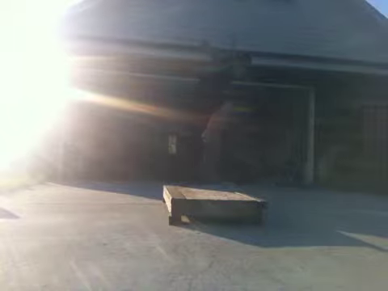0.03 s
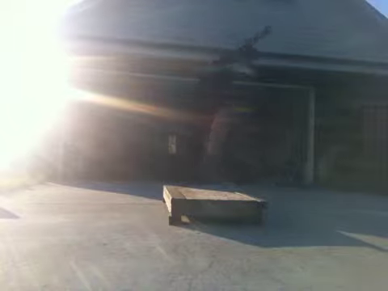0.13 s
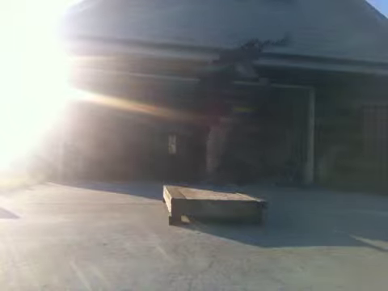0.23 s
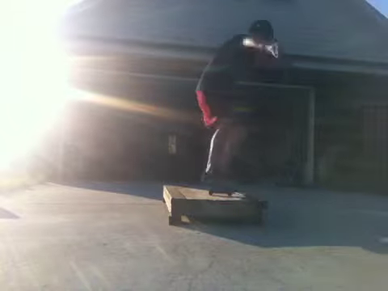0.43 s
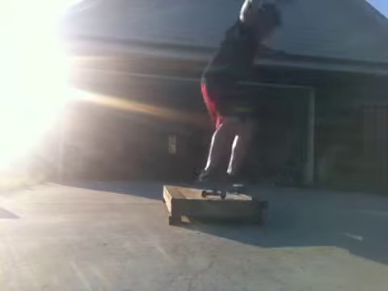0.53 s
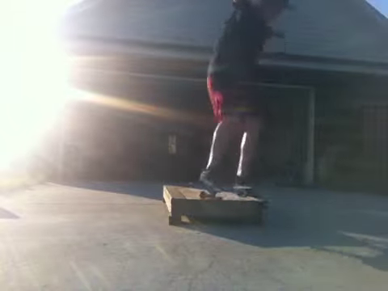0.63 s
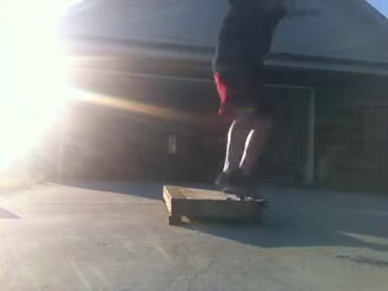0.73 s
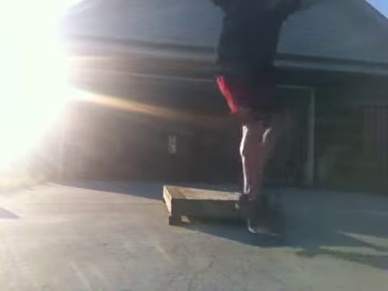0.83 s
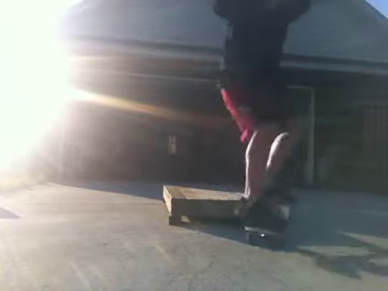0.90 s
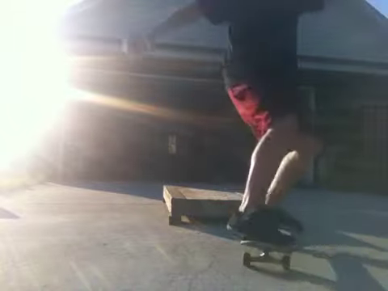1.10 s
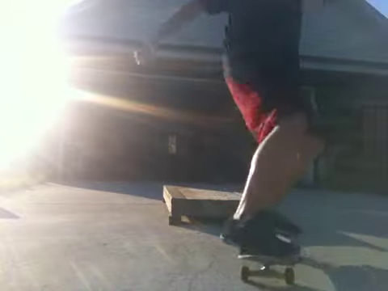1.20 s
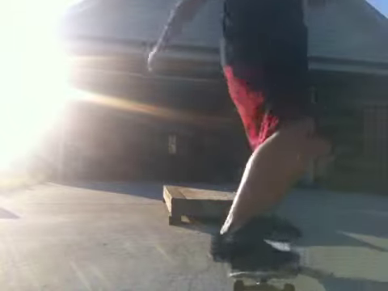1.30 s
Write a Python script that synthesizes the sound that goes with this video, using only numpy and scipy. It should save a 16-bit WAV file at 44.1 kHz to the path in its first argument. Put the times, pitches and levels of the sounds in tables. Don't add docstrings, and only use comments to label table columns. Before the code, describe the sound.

Skateboard landing with woody thuds and light metal clacks on a box, then dropping to concrete

```python
import sys
import numpy as np
from scipy import signal
from scipy.fft import rfft, irfft, next_fast_len
from scipy.io import wavfile
from scipy.ndimage import map_coordinates

SR = 44100
rng = np.random.default_rng(int(sys.argv[2]) if len(sys.argv) > 2 else 0)


def makeup_ratio(level_db):
    decades = np.asarray(level_db, float) / 20
    return 10 ** decades


def master_out(mix):
    frames = np.transpose(np.atleast_2d(mix))
    ceiling = np.clip(frames, -1, 1)
    pcm = np.round(ceiling * 32767).astype(np.int16)
    wavfile.write(sys.argv[1], SR, pcm)


N = 59535

# start in seconds, thud pitch in Hz,
# thud peak in dB, loudest region of the deck in Hz, deck peak in dB.
POP_AND_BOX_BLOWS = [(.006, 290, -73, 700, -46.5), (.012, 262, -48.5, 500, -40.5),
                     (.032, 300, -47, 500, -68), (.069, 310, -47.5, 454, -61), (.204, 300, -54, 500, -63.5),
                     (.241, 260, -32.5, 870, -32.5), (.244, 196, -43, 475, -38.5),
                     (.250, 267, -26.5, 710, -34.5), (.254, 181, -25.5, 507, -27),
                     (.266, 198, -40, 520, -38), (.287, 177, -31.5, 500, -63), (.296, 177, -54, 500, -53),
                     (.319, 260, -43, 590, -59), (0.329, 172, -37, 400, -42.5),
                     (.348, 282, -66, 524, -37.5), (0.359, 295, -52, 500, -51),
                     (.369, 295, -37.5, 442, -43)]
# start in seconds, thud pitch in Hz,
# thud peak in dB, loudest region of the deck in Hz, deck peak in dB.
DROP_BLOWS = [(.891, 274, -37.5, 611, -32), (.897, 269, -29, 670, -33.5), (0.907, 160, -40, 400, -43),
              (.914, 277, -36, 646, -31.5), (.927, 300, -34, 480, -55), (0.934, 194, -32, 400, -31.5),
              (0.949, 269, -33.5, 470, -67), (0.97, 220, -41, 440, -70), (0.987, 220, -47, 400, -67),
              (1.0018, 260, -60, 500, -29), (1.009, 310, -65, 780, -33.5), (1.0133, 257, -24.5, 500, -26.5),
              (1.028, 310, -29.5, 495, -43.5), (1.037, 220, -58, 400, -63), (1.055, 160, -40, 400, -76.5),
              (1.153, 170, -49.5, 500, -51.5)]
# pitch in Hz, level in dB, T60 in seconds.
DECK_MODES = [(400, -3.5, 0.076), (485, 6.5, 0.042), (549, -2.5, 0.043), (655.4, 3.5, .03),
              (722, -1, 0.062), (870, -2, 0.028), (1030, -1.5, 0.036)]
# start in seconds, loudest region in Hz, peak in dB.
TRUCK_CLACKS = [(.006, 3000, -56.5), (.007, 2190, -69), (.007, 1480, -50.5), (.014, 2740, -60),
                (0.239, 3200, -55.5), (0.243, 1350, -44), (.248, 2190, -48), (0.26, 1440, -44),
                (.270, 1590, -56), (0.291, 1300, -57.5), (0.349, 2950, -47), (.353, 1390, -46),
                (0.376, 1370, -61), (.892, 2344, -49.5), (0.897, 1400, -53), (.926, 2200, -56),
                (.933, 1440, -50.5), (1.002, 1530, -47), (1.011, 3200, -50), (1.014, 1540, -39),
                (1.017, 3400, -45), (1.015, 1880, -54.5), (1.015, 4900, -63), (.242, 4500, -45.5),
                (.348, 4600, -53), (1.038, 1330, -76)]
# pitch in Hz, level in dB, T60 in seconds.
TRUCK_MODES = [(1105, 5, 0.034), (1216, 5.5, 0.026), (1480, 3, 0.03), (1612, -3, 0.026),
               (1880, -7.5, 0.036), (2190, -4, 0.048), (2814, 2.5, 0.019), (2950, 2.5, 0.015),
               (3200, 6.5, 0.012), (3508, -7, 0.037), (4360, -14, 0.035), (4900, -6, 0.013)]
# time in seconds, level in dB.
ROLL_LEVEL = [(0, -58), (.1, -75), (.23, -83), (.3, -48), (.42, -52), (.5, -56), (.54, -54), (.63, -53),
              (.68, -55.5), (.73, -59.5), (.76, -60.5), (.88, -61.5), (1.0, -46), (1.11, -54),
              (1.14, -59.5), (1.19, -48.5), (1.235, -52.5), (1.3, -49)]
# centre in Hz, width in Hz, level in dB.
BOX_RESONANCES = [(160, 52, -5.5), (220, 24.8, 1.5), (260, 17.2, -3), (310, 23, -1.5), (418, 60, -9),
                  (491.4, 34.2, -4), (670, 90, -16.5), (960, 260, -25)]
# centre in Hz, width in Hz, level in dB.
GROUND_RESONANCES = [(141, 64, -5), (170, 17.6, 5.5), (222, 59, -10.5), (300, 30, -7), (390, 22, -14.5),
                     (500, 53, -13.5), (730, 87, -40.5), (900, 120, -40)]
# time in seconds, level in dB.
SCRAPE_LEVEL = [
    (.80, -125),
    (.845, -73),
    (.89, -71.5),
    (.92, -62),
    (.935, -56.5),
    (.96, -67.5),
    (.99, -106),
]
# frequency in Hz, level in dB.
SCRAPE_TONE = [(500, -39), (900, 7.5), (1500, 10.5), (2200, -3), (3000, 1.5), (4500, -12), (8000, -32)]
# frequency in Hz, T60 in seconds.
WALL_DECAY = [(150, 0.38), (500, 0.067), (1500, 0.14), (3000, 0.16), (6000, 0.056)]
# frequency in Hz, level in dB per Hz.
AIR_TONE = [(15, -10), (60, -23), (130, -2.5), (350, -5), (1000, -12.5), (5000, -19.5), (8500, -26.5),
            (15500, -39)]

SPOT_SCATTER_DB = 2.5


def unit(x):
    return x / np.sqrt(np.mean(x ** 2) + 1e-20)


def along(points, hz):
    f, value = np.transpose(points)
    return np.interp(np.log(hz + 1), np.log(f + 1), value)


def curve(rows):
    s, value = np.transpose(rows)
    return np.interp(np.arange(N) / SR, s, value)


def filtered(x, response):
    m = next_fast_len(N + SR // 2)
    spectrum = rfft(x, m) * response(np.fft.rfftfreq(m, 1 / SR))
    return irfft(spectrum, m)[..., :N]


def body(peaks):
    def response(f):
        total = 0
        for k, (centre, width, db) in enumerate(peaks):
            damping = 1j * f * width
            total = total + (-1) ** k * makeup_ratio(db) * damping / (centre * centre - f * f + damping)
        return total
    return response


def ring(modes, spot, centre_hz, fall_db, t):
    hz, db, t60 = np.transpose(modes)[..., None]
    octaves_away = np.abs(np.log2(hz / centre_hz))
    db = db - fall_db * octaves_away + SPOT_SCATTER_DB * spot[:len(hz), None]
    return np.sum(makeup_ratio(db - 60 * t / t60) * np.sin(2 * np.pi * hz * t), axis=0)


def blows():
    thud_t60_s, thud_rise_s, deck_rise_s = 0.061, 0.00091, 0.0016
    deck_fall_db = 19.5
    out, t = np.zeros(N + SR), np.arange(SR // 4) / SR
    spots = rng.standard_normal((40, 14))
    for (s, hz, thud_db, deck_hz, deck_db), spot in zip(POP_AND_BOX_BLOWS + DROP_BLOWS, spots):
        thud = makeup_ratio(thud_db - 60 * t / thud_t60_s) * np.sin(2 * np.pi * hz * t)
        thud = thud * (1 - np.exp(-t / thud_rise_s))
        deck = makeup_ratio(deck_db) * ring(DECK_MODES, spot, deck_hz, deck_fall_db, t)
        deck = deck * (1 - np.exp(-t / deck_rise_s))
        out[round(s * SR):][:len(t)] += thud + deck
    return out[:N]


def clacks():
    rise_s, truck_fall_db = 0.00079, 17
    rattle_depth, rattle_s = 0.49, 0.0012
    out, t = np.zeros(N + SR), np.arange(SR // 8) / SR
    spots = rng.standard_normal((30, 14))
    for (s, hz, db), spot in zip(TRUCK_CLACKS, spots):
        clack = makeup_ratio(db - 2) * ring(TRUCK_MODES, spot, hz, truck_fall_db, t)
        out[round(s * SR):][:len(t)] += clack * (1 - np.exp(-t / rise_s))
    flutter = map_coordinates(rng.standard_normal(N // 8), [np.arange(N) / SR / rattle_s])
    return out[:N] * (1 + rattle_depth * flutter)


def grit(per_s):
    chance, size = rng.random((2, N))
    jolts = (chance < per_s / SR) * rng.standard_normal(N)
    return jolts * makeup_ratio(-1.34 * np.log(size + 1e-9))


def rolling():
    ground_s, change_s, grit_per_s = 1.14, 0.034, 3000
    down = np.clip((np.arange(N) / SR - ground_s) / change_s, 0, 1)
    box = unit(filtered(grit(grit_per_s), body(BOX_RESONANCES)))
    ground = unit(filtered(grit(grit_per_s), body(GROUND_RESONANCES)))
    return makeup_ratio(curve(ROLL_LEVEL)) * (np.sqrt(1 - down) * box + np.sqrt(down) * ground)


def scrape():
    drag = filtered(grit(8000), lambda hz: makeup_ratio(along(SCRAPE_TONE, hz)))
    return makeup_ratio(curve(SCRAPE_LEVEL)) * unit(drag)


def wall(x):
    delay_s = 0.012
    hz, t, z = signal.stft(rng.standard_normal(SR // 2), SR, nperseg=256)
    fade = makeup_ratio(-60 * t / along(WALL_DECAY, hz)[:, None])
    tail = signal.istft(z * fade, SR, nperseg=256)[1]
    late = np.pad(x, (round(delay_s * SR), 0))
    return signal.fftconvolve(late, tail / np.linalg.norm(tail))[:N]


def air():
    noise = filtered(rng.standard_normal(N), lambda hz: makeup_ratio(along(AIR_TONE, hz)))
    return makeup_ratio(-68.5) * unit(noise)


def low_cut(f):
    cut_hz, gentle_hz = 110, 70
    steep = -f * f / (cut_hz ** 2 - f * f + 1.3j * f * cut_hz)
    return steep * 1j * f / (gentle_hz + 1j * f)


def scene():
    wall_db, metal_to_wall_db = -12, -6
    wood = blows()
    metal = clacks() + scrape()
    answer = makeup_ratio(wall_db) * wall(wood + makeup_ratio(metal_to_wall_db) * metal)
    near = wood + metal + answer + rolling()
    return (filtered(near, low_cut) + air())[None]


def top_cut(x):
    return signal.sosfilt(signal.butter(12, 15610, fs=SR, output="sos"), x)


def record(dry):
    top_hz = 15650
    mix = filtered(dry, lambda hz: hz < top_hz)
    return top_cut(mix)


dry = scene()
out = record(dry)
master_out(out)
```